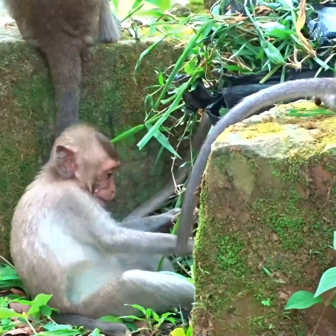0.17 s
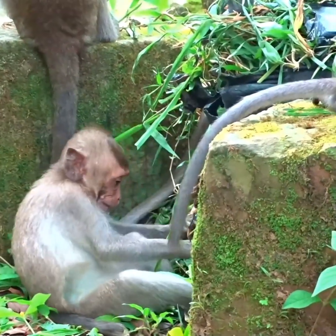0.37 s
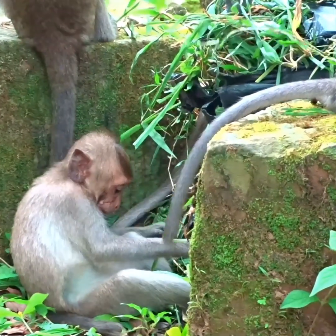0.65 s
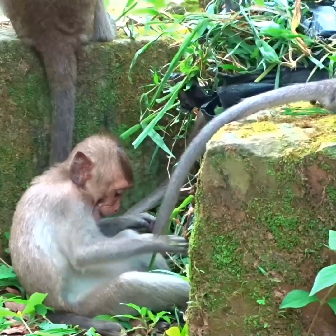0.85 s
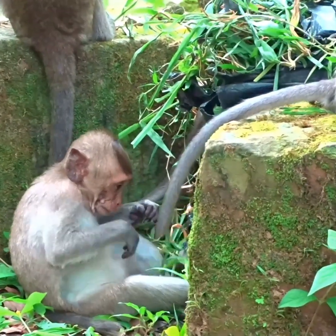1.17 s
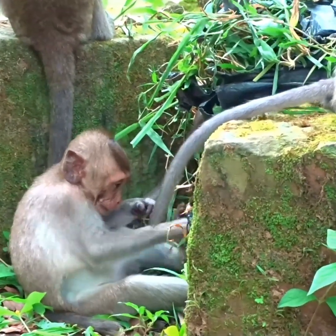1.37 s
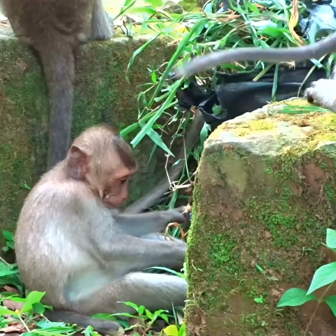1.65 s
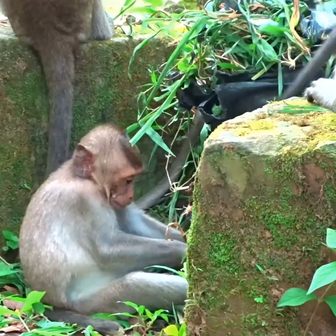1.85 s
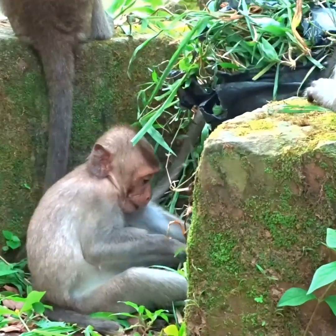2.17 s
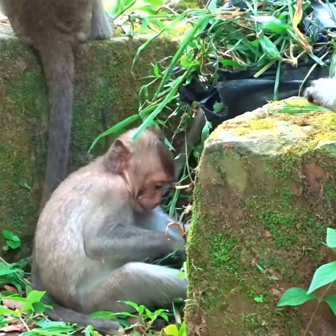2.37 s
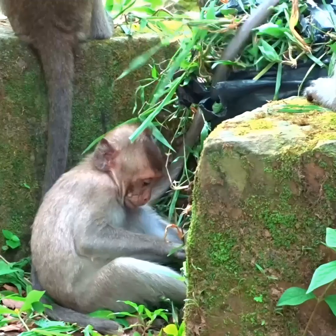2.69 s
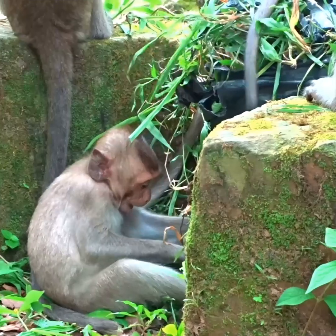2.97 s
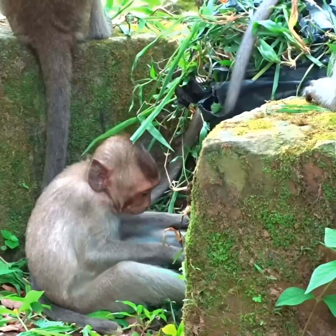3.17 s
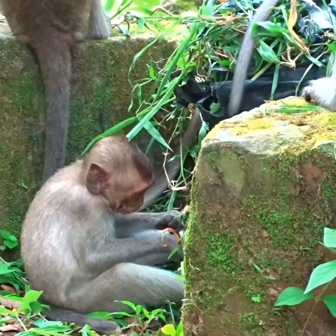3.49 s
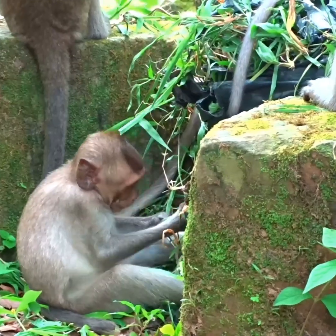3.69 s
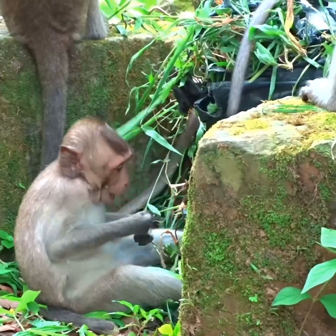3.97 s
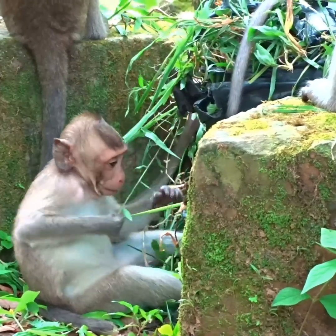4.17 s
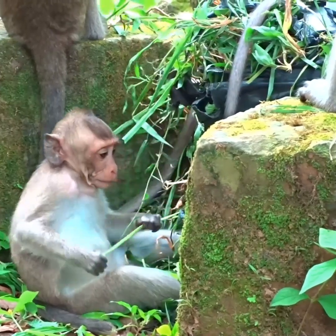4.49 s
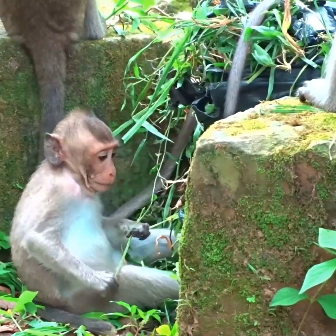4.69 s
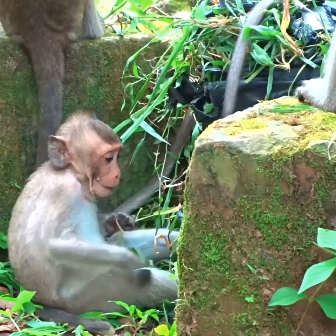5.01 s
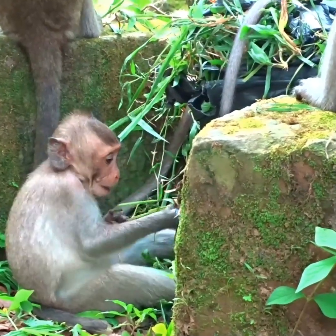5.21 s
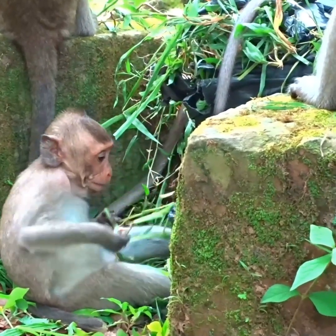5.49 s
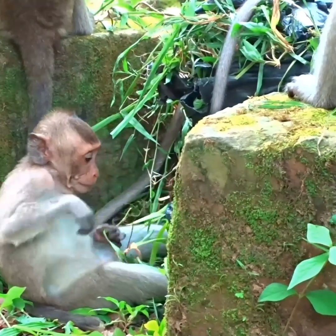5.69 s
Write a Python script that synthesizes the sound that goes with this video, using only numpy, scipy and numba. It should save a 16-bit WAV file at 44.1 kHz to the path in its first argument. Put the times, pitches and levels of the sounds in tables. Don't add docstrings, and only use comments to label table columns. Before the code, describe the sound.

Raspy, piercing squeals of a small monkey come in quick succession slightly right, with brief clear squeaks, twig ticks and a soft low drone.

```python
import sys
import numpy as np
from scipy import signal
from scipy.fft import rfft, irfft, next_fast_len
from scipy.io import wavfile
from scipy.ndimage import uniform_filter1d
from numba import njit

SR = 44100
rng = np.random.default_rng(int(sys.argv[2]) if len(sys.argv) > 2 else 0)


def master_out(mix):
    frames = np.transpose(np.atleast_2d(mix))
    ceiling = np.clip(frames, -1, 1)
    pcm = np.round(ceiling * 32767).astype(np.int16)
    wavfile.write(sys.argv[1], SR, pcm)


def invert_db(x):
    u = np.asarray(x, float) / 20
    return 10 ** u


N = 257984

# [f/Hz, likeness 0..1]
HUSH_ALIKE = [(30, 0.97), (125, 0.983), (250, 0.822), (500, 0.378), (2000, 0.56), (12000, 0.7)]
RISE_TREMBLE, FALL_TREMBLE = 0.0282, 0.0391


def rms_one(x):
    return x / np.sqrt(np.mean(x ** 2) + 1e-20)


def in_time(rows):
    s, *columns = np.transpose(rows)
    return [np.interp(np.arange(N) / SR, s, column) for column in columns]


def at_hz(points, hz):
    table_hz, value = np.transpose(points)
    return np.interp(np.log(hz), np.log(table_hz), value)


def drift(rate, size=N):
    step = max(1, int(SR / rate / 50))
    r = np.exp(-2 * np.pi * rate * step / SR)
    slow = signal.lfilter([1], [1, -2 * r, r * r], rng.standard_normal(size // step + 202))[200:]
    slow = slow * np.sqrt((1 - r * r) ** 3 / (1 + r * r))
    return np.interp(np.arange(size) / step, np.arange(len(slow)), slow)


def bands(size, alike, shape, lo_hz, hi_hz):
    count = round(3 * np.log2(hi_hz / lo_hz))
    edges = lo_hz * 2 ** (np.arange(count + 1) / 3)
    white = rng.standard_normal((2, 2, size))
    out = 0
    for k, (low, high) in enumerate(zip(edges, edges[1:])):
        hz = np.sqrt(low * high)
        band = signal.butter(2, [low, high], "band", fs=SR, output="sos")
        mid, side = signal.sosfilt(band, white[k % 2])
        c = np.clip(at_hz(alike, hz), 0, 1)
        pair = np.sqrt(1 + c) * mid + np.sqrt(1 - c) * side * [[1], [-1]]
        out = out + shape(hz) * pair
    return out


@njit
def resonate(x, hz, width, sr):
    y, r = np.zeros(len(x)), np.exp(-np.pi * width / sr)
    for i in range(2, len(x)):
        drive = (1 - r * r) / 2 * (x[i] - x[i - 2])
        y[i] = drive + 2 * r * np.cos(2 * np.pi * hz[i] / sr) * y[i - 1] - r * r * y[i - 2]
    return y


def cavity(x, hz, width_hz, count=2):
    for _ in range(count):
        x = resonate(x, hz + 0 * x, float(width_hz), SR)
    return x / np.sqrt(uniform_filter1d(x ** 2, size=1500) + 1e-12)


def add(out, start_s, wave, fade_s):
    start, ramp = round(start_s * SR), np.arange(len(wave)) / (fade_s * SR)
    faded = wave * np.clip(np.minimum(ramp, ramp[::-1]), 0, 1)
    out[start:start + len(wave)] += faded[:N - start]


def hush():
    # [f/Hz, level/dB per Hz]
    colour_db = [(160, -15), (200, -9.5), (300, -14), (600, -12.5), (1000, -18.5), (1400, -20),
                 (1800, -22.5), (2300, -20), (3000, -24), (4200, -29), (7000, -26), (11000, -37.5),
                 (15800, -36)]
    # [t/s, level/dB]
    traffic_db = [(0, 3.5), (1.3, 0.5), (1.7, 6.5), (2.1, 2), (5.2, 1.5), (5.45, 3.5), (5.85, 4)]
    swell_db = in_time(traffic_db)[0]

    def shape(hz):
        return invert_db(at_hz(colour_db, hz) + .8 * drift(4) + (hz < 1600) * swell_db)

    air = bands(N, HUSH_ALIKE, shape, 160, 16000)
    return invert_db(-55 + 3.5) * rms_one(air)


def drone():
    # [f/Hz, level/dB per Hz]
    rumble_db = [(11, -44), (18, -19), (38, -3.5), (108, -2), (140, 0), (201, -16.5), (300, -30),
                 (390, -54), (660, -120)]
    # [t/s, level/dB]
    drone_db = [(0.0, -31.5), (0.19, -41), (0.33, -38.5), (5.85, -37.5)]
    # [f/Hz, blur width/Hz, level/dB]
    engine = [(34.3, 2.785, -49), (48.9, 5.083, -45), (75.92, 3.427, -46.5), (93.62, 3.768, -45.5),
              (107.71, 4.947, -47.5), (135.7, 5.14, -48.5)]
    rumble = rms_one(bands(N, HUSH_ALIKE, lambda hz: invert_db(at_hz(rumble_db, hz)), 18, 290))
    t = np.arange(N) / SR
    orders = 0
    for hz, width_hz, level_db in engine:
        cycles = hz * t + np.cumsum(drift(1.52)) * width_hz / 2 / SR
        orders = orders + invert_db(level_db + 2.0 * drift(0.745)) * np.sin(2 * np.pi * cycles)
    return invert_db(in_time(drone_db)[0]) * rms_one(invert_db(-39.5) * rumble + np.sqrt(2) * orders)


def effort(rise_s, length_s, onset_db, drop_db):
    rise_bend, fall_bend = 2.063, 0.824
    t = np.arange(round(length_s * SR)) / SR
    rise = np.clip(1 - t / rise_s, 0, 1)
    fall = np.clip((t - rise_s) / max(length_s - rise_s, .003), 0, 1)
    return -onset_db * rise ** rise_bend - drop_db * fall ** fall_bend


def folds(size, beat_hz, wander, jitter, rough):
    rate = beat_hz * (1 + wander * drift(14, size=size) + jitter * drift(500, size=size))
    cycle = np.cumsum(rate) / SR
    clap = np.diff(np.floor(cycle), prepend=0)
    closures = rms_one(clap * invert_db(3.37 * rng.standard_normal(size)))
    air = rng.standard_normal(size) * (1 + .5 * np.cos(2 * np.pi * cycle))
    return (1 - rough) * closures + rough * air


def screeches():
    # [start t/s, rise/s, length/s, peak level/dB, end level/dB]
    cries = [(0, .005, 0.0456, -55, -63), (0.049, 0.0044, 0.2203, -47.5, -73.5),
             (0.759, 0.107, 0.22, -70, -74), (1.03, 0.123, 0.267, -49.5, -54.5),
             (1.31, 0.103, 0.229, -30.5, -36.5), (1.583, 0.122, 0.247, -30.5, -35.5),
             (1.896, 0.146, 0.2396, -24, -27.5), (2.216, 0.1104, 0.2026, -22.5, -38.5),
             (2.511, 0.095, 0.475, -28, -48.5), (2.952, 0.1595, 0.216, -38, -54),
             (3.217, 0.0463, 0.11, -29, -47.5), (3.46, 0.052, 0.3804, -22, -42.5),
             (3.964, 0.0656, 0.671, -23.5, -48.5), (4.55, 0.078, 0.181, -38, -56.5),
             (4.949, 0.136, 0.306, -31, -34), (5.391, 0.135, 0.228, -35, -45.5),
             (5.79, 0.1, 0.066, -38.5, -29.5)]
    # [fold beats/Hz, throat f/Hz, mouth f/Hz, lips f/Hz, mouth width/Hz]
    tracts = [(784, 2800, 4300, 6720, 2400), (786.6, 2782, 4180, 5500, 3300), (796, 2660, 3810, 7560, 1740),
              (803, 2360, 6340, 7460, 1400), (1308, 2370, 4480, 6675, 2260),
              (1315.2, 2260, 4040, 6680, 3140), (885, 3008, 4585, 7370, 1840),
              (1348.3, 2623, 4593, 8290, 2150), (1432.6, 2560, 4903, 7850, 1800),
              (1434, 3200, 5107, 7960, 1260), (795, 3280, 5060, 7380, 2320),
              (1457.6, 2970, 4790, 7870, 1810), (799.6, 3460, 4780, 7854, 1980),
              (863.5, 3170, 4590, 7000, 2070), (1257.9, 2960, 4694, 7560, 2200),
              (703, 2848, 3550, 6340, 2850), (814, 2520, 5750, 7030, 2550)]
    # [start below peak/dB, throat level/dB, lips level/dB, edge level/dB, jaw opening/share per s]
    colours = [(1, 4, 3, -14.5, .01), (1, 9, 6, -28.5, 0.32), (9.8, 6.5, 6.5, -16, -0.02),
               (20, 0.5, -1, -30, -0.42), (14, -12, 0, -39.5, -0.08), (4, -9, -2, -27.5, -0.36),
               (20.34, -11.5, -5, -22, -0.38), (10.14, -20, -5.5, -18.5, -0.43), (9, -37, -1, -11, 0.27),
               (4, -37, 2.5, -4.5, 0.23), (12, -13, -0.5, -22, -0.43), (15.9, -38, -3, -16, 0.29),
               (18, -26, -2.5, -17, 0.14), (12, -28.5, 9, -12.5, -0.34), (22.2, -12.5, 2.5, -20, -0.95),
               (11, -4, 3, -27.5, 0.02), (20.2, 0, 6.5, -22, 0.08)]
    throat_follows, lips_follow, edge_follows = 0.645, 0.594, 0.194
    throat_lift, mouth_lift, lips_lift = 0.0022, 0.0027, 0.001
    jaw_mouth, jaw_throat = 0.49, 0.86
    jaw_lips_db, jaw_edge_db = 22.5, 89.5
    edge_swell_s, edge_fade_db_per_s = .025, 17
    out = np.zeros(N)
    for cry, tract, colour in zip(cries, tracts, colours):
        start_s, rise_s, length_s, peak_db, end_db = cry
        beat_hz, throat_hz, mouth_hz, lips_hz, mouth_width_hz = tract
        onset_db, throat_db, lips_db, edge_db, jaw_per_s = colour
        push_db = effort(rise_s, length_s, onset_db, peak_db - end_db)
        size = len(push_db)
        t = np.arange(size) / SR
        jaw = jaw_per_s * (t - rise_s)
        one, other = [folds(size, beat_hz, .04, .07, .5) for _ in range(2)]
        shake = [1 + .05 * drift(25, size=size) for _ in range(3)]
        flutter_db = [0.82 * drift(22, size=size) for _ in range(4)]

        mouth_hz = mouth_hz * (1 - mouth_lift * push_db + jaw_mouth * jaw) * shake[0]
        lips_hz = lips_hz * (1 - lips_lift * push_db + jaw) * shake[1]
        throat_hz = throat_hz * (1 - throat_lift * push_db + jaw_throat * jaw) * shake[2]

        mouth_db = push_db + flutter_db[0]
        lips_db = lips_db + lips_follow * push_db + jaw_lips_db * jaw + flutter_db[1]
        edge_db = edge_db + edge_follows * push_db + jaw_edge_db * jaw
        edge_db = edge_db - edge_fade_db_per_s * t + flutter_db[2]
        throat_db = throat_db + throat_follows * push_db + flutter_db[3]

        voice = invert_db(mouth_db) * cavity(one, mouth_hz, mouth_width_hz)
        voice += invert_db(lips_db) * cavity(other, lips_hz, 4020, count=3)
        voice += np.minimum(t / edge_swell_s, 1) * invert_db(edge_db) * cavity(one, 13230, 8300)
        voice += invert_db(throat_db) * cavity(other, throat_hz, 1450, count=3)
        add(out, start_s, voice * invert_db(peak_db - 3), .009)
    return out


def broken(x, depth_db):
    spec = signal.stft(x, nperseg=256)[2]
    patches = uniform_filter1d(rng.standard_normal(spec.shape), size=3, axis=0)
    patches = uniform_filter1d(patches, size=9, axis=1)
    out = signal.istft(spec * invert_db(depth_db * rms_one(patches)), nperseg=256)[1][:N]
    return out * np.sqrt(np.mean(x ** 2) / np.mean(out ** 2))


def locks():
    # [t/s, length/s, start f/Hz, level/dB]
    sagging = [(.06, 0.035, 5820, -50), (1.349, 0.099, 7837, -36.5), (1.593, 0.061, 8714, -45),
               (1.601, 0.0726, 2455, -46.5), (1.924, 0.095, 9840, -38.5), (1.97, 0.081, 4440, -34.5),
               (1.978, 0.121, 6900, -35.5), (2.059, 0.0347, 3890, -31), (2.236, 0.036, 10350, -40),
               (2.26, 0.0776, 4640, -34), (2.59, 0.091, 9480, -43.5), (2.599, 0.072, 7350, -34.5),
               (2.749, 0.066, 10440, -45), (3.473, 0.086, 4862, -31.5), (3.991, 0.065, 3992, -36.5),
               (4.59, 0.088, 7890, -42.5)]
    # [t/s, length/s, start f/Hz, level/dB]
    held = [(.056, 0.0237, 3710, -41), (.058, 0.127, 2241, -49), (1.06, 0.157, 1655, -57),
            (1.08, 0.209, 5520, -58), (1.318, 0.246, 3798, -42), (1.6, 0.114, 6847, -38),
            (1.645, 0.047, 5310, -31), (1.9, 0.075, 10490, -47), (1.975, 0.076, 7910, -28.5),
            (1.979, 0.071, 7070, -29.5), (2.277, 0.056, 6870, -35.5), (2.56, 0.052, 4316, -36),
            (3.0, 0.056, 10700, -45.5), (3.21, 0.0653, 4690, -39), (3.43, 0.045, 11350, -47),
            (3.527, 0.049, 5994, -31.5), (3.945, 0.057, 11870, -45.5), (3.98, 0.194, 7620, -39.5),
            (4.03, 0.153, 8490, -40), (4.201, 0.465, 4572, -44.5), (4.202, 0.19, 9205, -45.5),
            (4.257, 0.084, 9940, -53.5), (4.95, 0.062, 2524, -55.5), (4.96, 0.076, 3710, -47.5),
            (5.05, 0.122, 4780, -40), (5.08, 0.153, 2053, -54), (5.14, 0.162, 4062, -44),
            (5.42, 0.116, 1796, -53.5), (5.47, 0.124, 6084, -43), (5.48, 0.125, 3200, -45.5)]
    sag_per_s, creep_per_s = -1.223, 0.148
    out = np.zeros(N)
    for rows, slide_per_s in ((sagging, sag_per_s), (held, creep_per_s)):
        for start_s, length_s, from_hz, level_db in rows:
            size = round(length_s * SR)
            slide = 1 + slide_per_s * np.arange(size) / SR
            hz = from_hz * slide * (1 + 0.01 * drift(30, size=size))
            line = cavity(rng.standard_normal(size), hz, 502, count=3)
            add(out, start_s, invert_db(level_db + 2.5 + 2.2 * drift(40, size=size)) * line, .015)
    return out


def twigs():
    # [t/s, peak level/dB, centre f/Hz, left-right level/dB]
    ticks = [
        (.868, -45.5, 5000, 0),
        (2.765, -35, 1770, -8.5),
        (2.8571, -35.5, 2020, -6.5),
        (2.882, -39, 1296, -8.5),
        (3.326, -26.5, 3070, 6),
        (3.5296, -30.5, 2210, 1.5),
        (3.828, -37.5, 2240, -4),
        (4.868, -41.5, 13540, 3),
        (5.2294, -49.5, 2022, 0.5),
    ]
    out, t = np.zeros((2, N)), np.arange(400) / SR
    for start_s, peak_db, hz, pan_db in ticks:
        burst = rng.standard_normal(400) * invert_db(-60 * t / 0.0201)
        snap = resonate(burst, hz + 0 * t, 1780.0, SR)
        at = round(start_s * SR)
        sides = invert_db([[pan_db / 2], [-pan_db / 2]])
        out[:, at:at + 400] += invert_db(peak_db) * snap / np.abs(snap).max() * sides
    return out


def squeaks():
    # [t/s, length/s, start f/Hz, end f/Hz, peak level/dB]
    clear = [
        (1.075, .065, 5300, 5600, -53),
        (1.095, .035, 2400, 2320, -48),
        (1.65, .105, 5400, 2800, -30),
        (1.66, .06, 7900, 6600, -30),
        (3.255, .035, 4950, 3680, -33),
        (3.425, .026, 2390, 4600, -29),
        (3.934, .028, 2690, 4000, -28),
        (4.93, .05, 2300, 2520, -52),
        (4.94, .035, 3180, 3750, -42),
    ]
    overtones_db = [-34, -34]
    rise_bend, fall_bend = 1.662, 1.9
    arch_db, break_db = 14.5, 3.5
    out = np.zeros(N)
    for start_s, length_s, from_hz, to_hz, peak_db in clear:
        u = np.linspace(0, 1, round(length_s * SR))
        rising = to_hz > from_hz
        if rising:
            way, tremble = 1 - (1 - u) ** rise_bend, RISE_TREMBLE
        else:
            way, tremble = u ** fall_bend, FALL_TREMBLE
        hz = (from_hz + (to_hz - from_hz) * way) * (1 + tremble * drift(259, size=len(u)))
        phase = 2 * np.pi * np.cumsum(hz) / SR
        tone = np.sin(phase)
        level_db = peak_db - arch_db * (2 * u - 1) ** 2
        if rising:
            for partial, db in enumerate(overtones_db, start=2):
                tone = tone + invert_db(db) * np.sin(partial * phase)
        else:
            level_db = level_db + break_db * drift(60, size=len(u))
        add(out, start_s, np.sqrt(2) * invert_db(level_db) * tone, .002)
    return out


def scatter(x, gap_s, build_s):
    # [f/Hz, likeness 0..1]
    echo_alike = [(2000, 1), (4000, 0.965), (6000, 1), (8000, 0.99), (13000, 0.55)]
    # [f/Hz, decay/s]
    echo_t60 = [(1500, 2.51), (4000, 0.945), (8000, 0.974), (14000, 0.524)]
    t = np.arange(round(1.2 * SR)) / SR

    def decay(hz):
        t60_s = at_hz(echo_t60, hz)
        return invert_db(-60 * t / t60_s) / np.sqrt(t60_s)

    tail = bands(len(t), echo_alike, decay, 1000, 16000)
    tail = tail * (1 - np.exp(-np.maximum(t - gap_s, 0) / build_s))
    tail = tail / np.sqrt(np.sum(tail ** 2) / 2)
    return signal.fftconvolve(x[None], tail, axes=1)[:, :N]


def lean(pair):
    # [f/Hz, left-right level/dB]
    lean_db = [(1500, -1), (3000, -2.5), (5500, -3), (8000, -1), (9000, -0.5), (10200, -12), (11500, -5.5),
               (15000, -2.5)]
    # [f/Hz, left lead/rad]
    twist_rad = [(1500, 0.73), (2300, 0.614), (5700, 0.502), (7700, -0.21), (9000, -0.555), (10500, 0.9),
                 (12000, 0.24)]
    size = next_fast_len(N)
    hz = np.arange(size // 2 + 1) * SR / size + 1
    left = invert_db(at_hz(lean_db, hz) / 2) * np.exp(.5j * at_hz(twist_rad, hz))
    return irfft(rfft(pair, size) * [left, 1 / left], size)[:, :N]


def scene():
    rasp = broken(screeches(), 4.0)
    rasp = signal.sosfilt(signal.butter(4, 1843, "high", fs=SR, output="sos"), rasp)
    voice = rasp + locks() + squeaks()
    echoes = scatter(voice, gap_s=0.00187, build_s=0.0091)
    monkey = lean(invert_db(-1) * voice + invert_db(-4.0) * echoes)
    return monkey + twigs() + hush() + drone()


def roll_off(x):
    return signal.sosfilt(signal.butter(12, 15970, fs=SR, output="sos"), x)


def record(dry):
    cut = signal.sosfilt(signal.cheby2(14, 60, 16200, fs=SR, output="sos"), dry)
    return roll_off(cut)


dry = scene()
out = record(dry)
master_out(out)
```